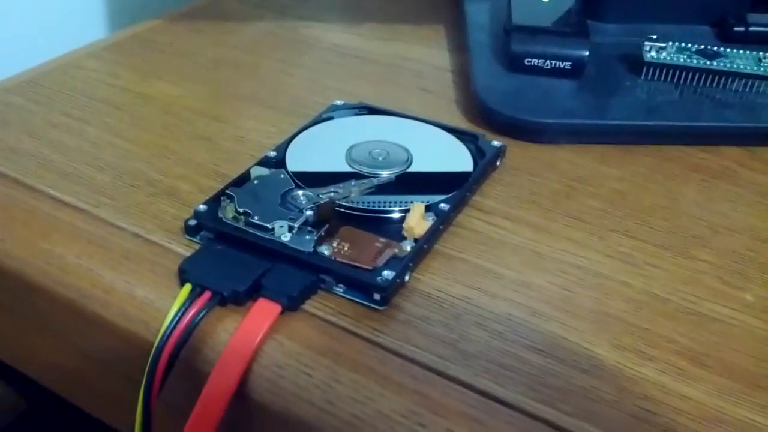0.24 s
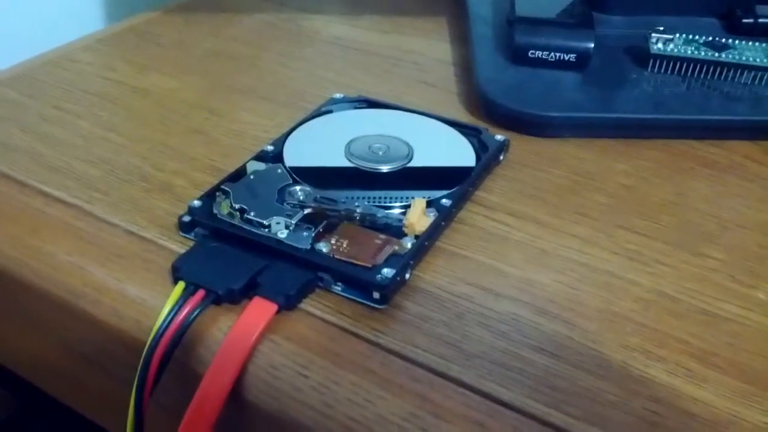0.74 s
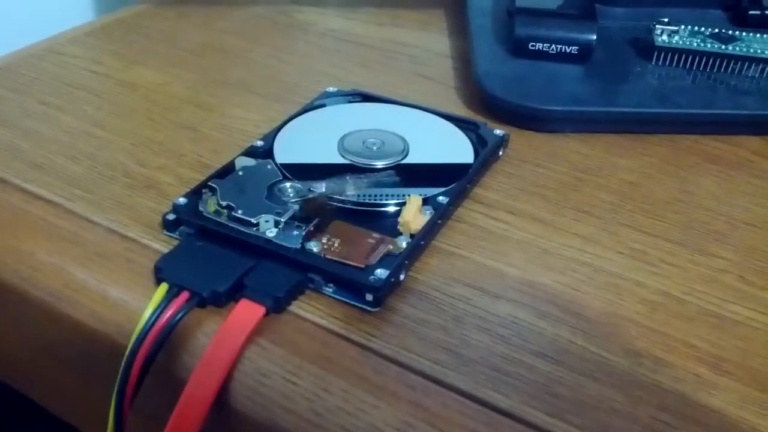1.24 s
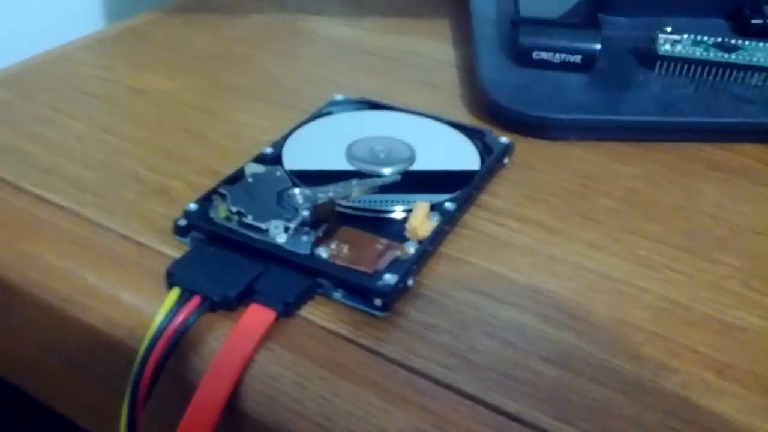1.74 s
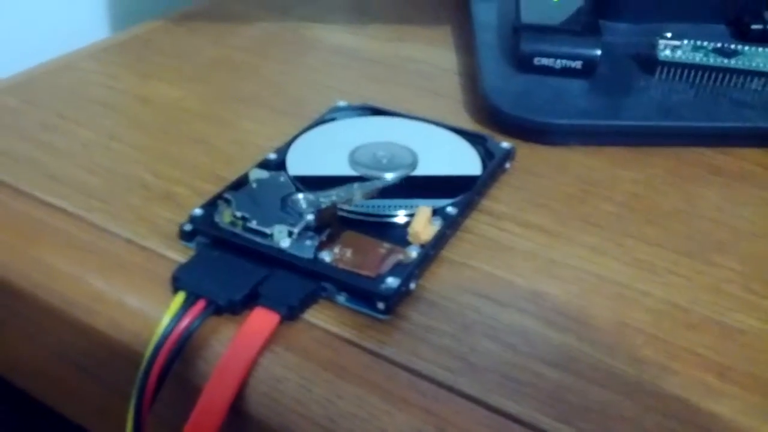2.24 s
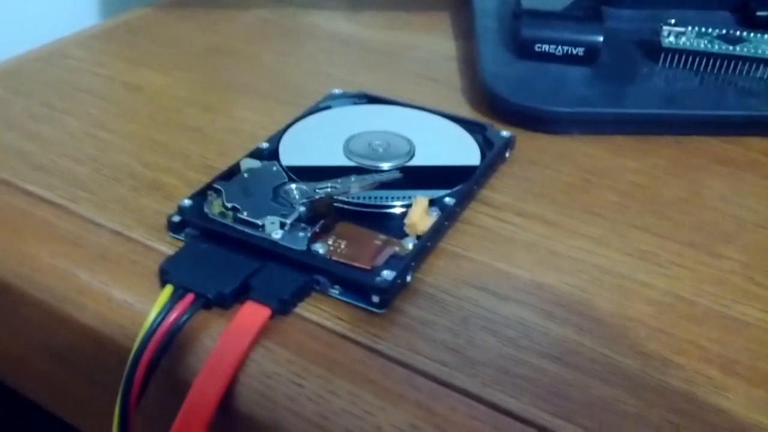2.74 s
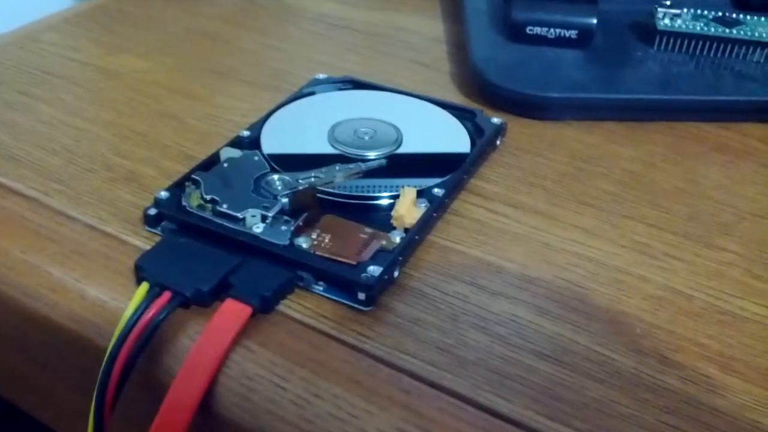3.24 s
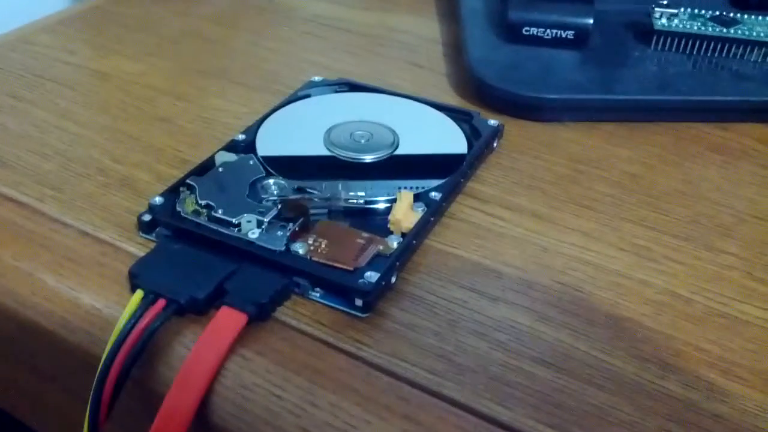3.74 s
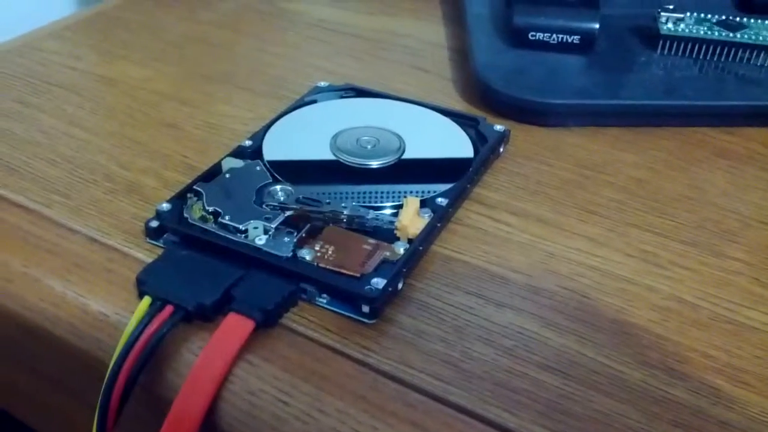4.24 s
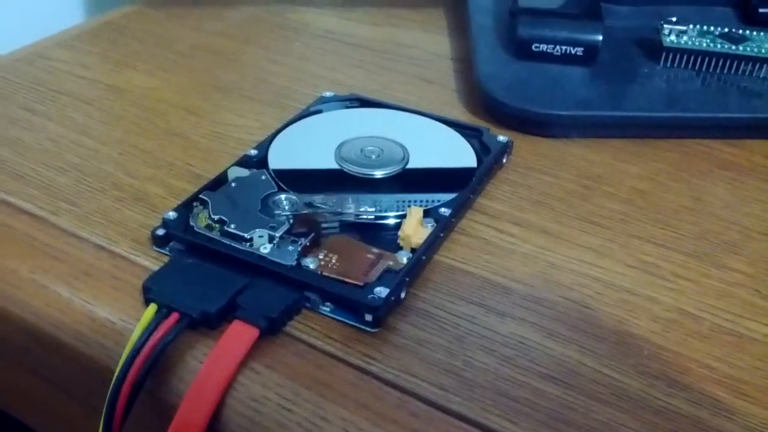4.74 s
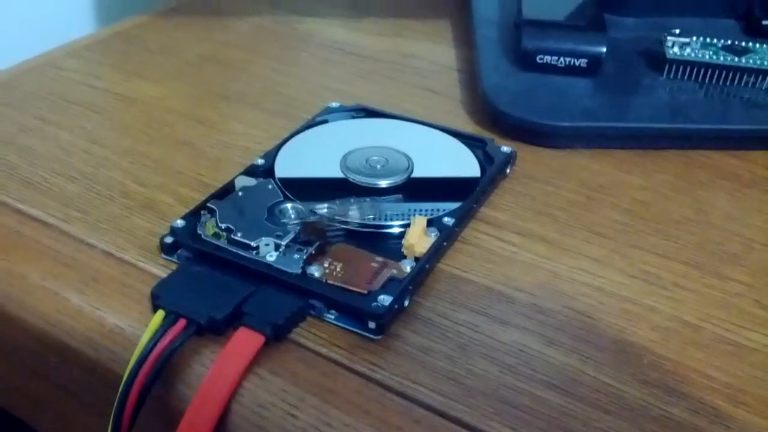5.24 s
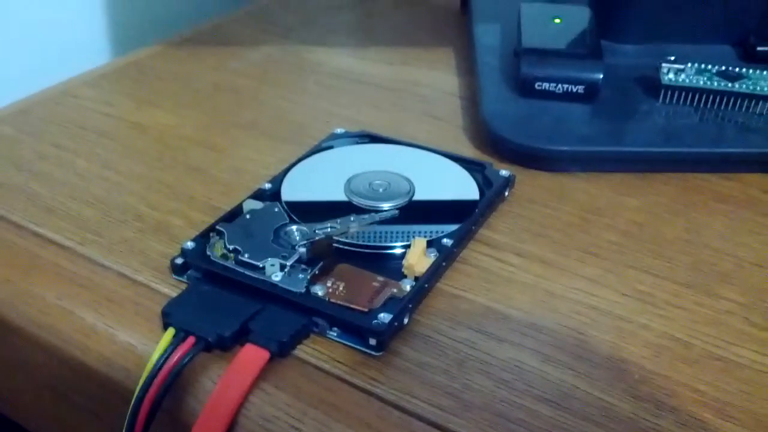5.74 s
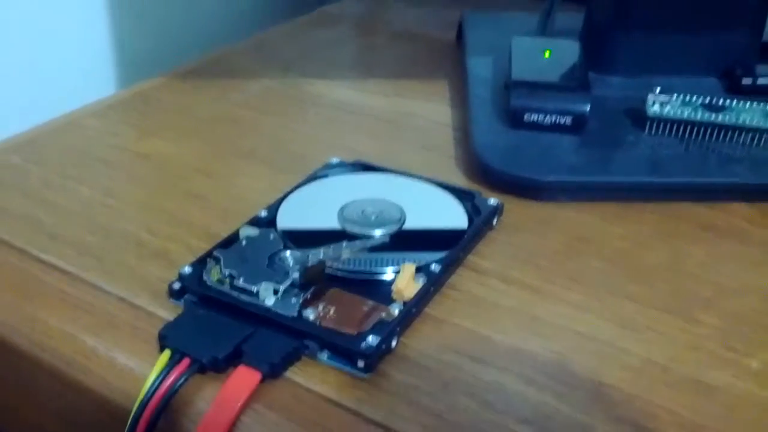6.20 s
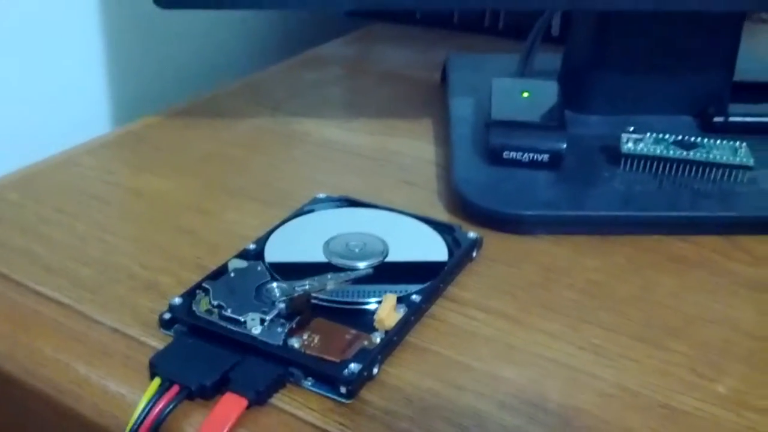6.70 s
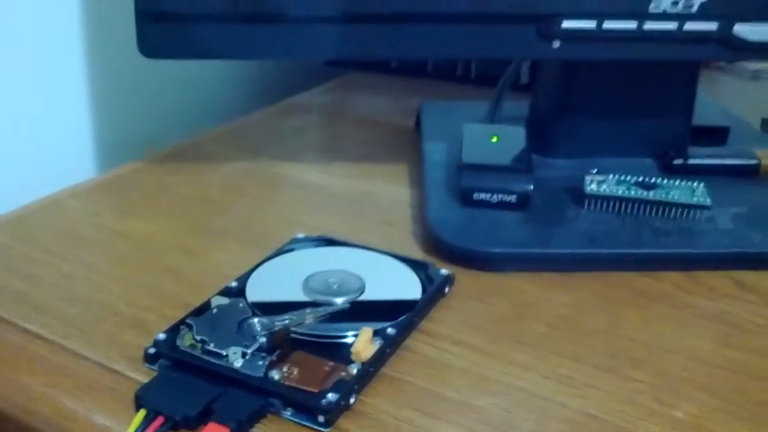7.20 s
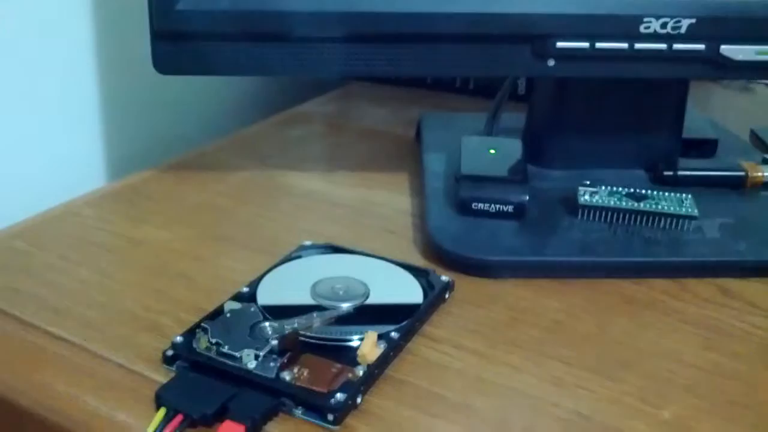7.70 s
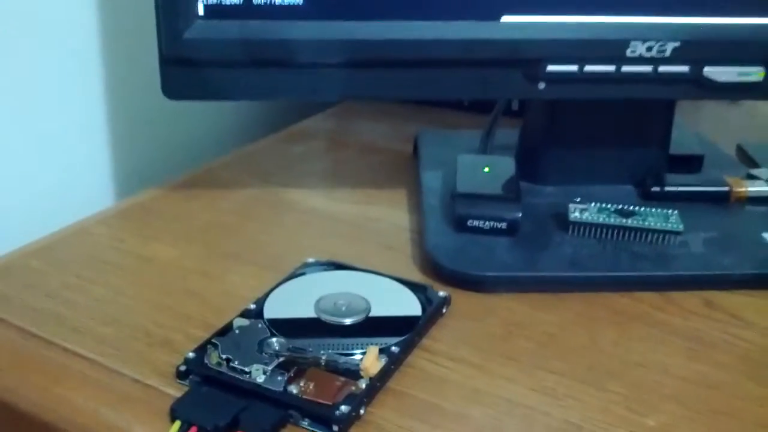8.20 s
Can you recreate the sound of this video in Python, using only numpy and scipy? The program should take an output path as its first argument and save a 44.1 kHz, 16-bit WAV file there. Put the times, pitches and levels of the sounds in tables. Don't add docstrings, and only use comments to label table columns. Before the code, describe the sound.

Close up, a failing hard drive on a wooden desk is already hissing as one sharp clack lands and it cuts out. After a quiet gap of tiny ticks, a run of five evenly spaced metallic clacks rides on bright hiss. A longer pause leaves fan hum and faint whine, then another run of clacks follows and dies away.

```python
import sys
import numpy as np
from scipy import signal
from scipy.fft import rfft, irfft, next_fast_len
from scipy.io import wavfile
from scipy.ndimage import uniform_filter1d

SR = 44100
rng = np.random.default_rng(int(sys.argv[2]) if len(sys.argv) > 2 else 0)


def dump(signal):
    limited = np.clip(np.atleast_2d(signal).T, -1, 1)
    pcm = np.round(limited * 32767).astype(np.int16)
    wavfile.write(sys.argv[1], SR, pcm)


def boost_factor(decibels):
    exponent = np.asarray(decibels, float) / 20
    return 10 ** exponent


N = 372761

# start, coil eases, coil cuts out, parked-head blip, all in seconds.
RUNS = [
    (-.1, .372, .458, .7021),
    (1.482, 3.635, 3.758, 4.0804),
    (5.584, 7.81, 7.906, 8.2117),
]
# time in seconds, blow in dB, brightness in dB per octave, rebound in dB,
# gain in dB of the low modes coupled to the desk.
SLAMS = [(0.2638, -9, -1.5, -11, -4), (1.8058, -9.5, 2.5, -7, 0.5), (2.2396, -10, 1, -11, -2.3),
         (2.67, -10, 1, -11, -2), (3.0872, -10.5, 1, -6.5, 0.2), (3.5157, -9, 0, -7, -4.5),
         (5.9402, -11, 0.6, -12, -1.5), (6.3625, -11, 0.5, -8, -1.5), (6.8013, -10, 1, -8, 0.5),
         (6.995, -21, 5.5, -26, 6.5), (7.2484, -11, 3, -4.5, 3), (7.6849, -12, 0.7, -6.5, 1.5)]
# time in seconds, level in dB, brightness in dB per octave, length in ms,
# dB the coil eases off just after.
SCUFFS = [(0.388, -26, 2.5, 3.5, 1), (0.458, -30, 4, 6.9, -1), (0.4854, -40, 4, 5.5, -6),
          (1.487, -25.5, 2.5, 9.6, -3), (1.745, -37, -8, 6, 1), (1.9257, -32, 0, 6, 3),
          (2.358, -28, 0, 3.9, 7.5), (2.775, -25, 2, 4.1, 8), (3.201, -22, 1, 6.9, -2),
          (3.638, -25.5, 0, 9.4, -4), (3.791, -42, 1, 7.5, -2), (5.6244, -23, 3.3, 7.4, 8),
          (6.05, -26.5, -1, 5.2, 5), (6.4878, -30, -4, 2.7, 2), (6.9152, -34.5, 1, 6, 0),
          (6.935, -29.5, 3, 4.9, 2), (7.3668, -28, -3, 11.5, -2), (7.815, -25, 5.3, 6.5, 1.5),
          (7.9325, -40, 7, 5.4, 1)]
ARM_HZ = [3690, 4320, 4500, 5300, 6300, 6950, 7600, 8310, 8945, 9370, 9495, 10140, 10695, 11480, 12595,
          13300, 13880, 14600, 15700]


def evened(x):
    return x / np.sqrt(np.mean(x ** 2) + 1e-20)


def read(points, hz):
    f, value = np.transpose(points)
    return np.interp(np.log(hz + 1), np.log(f + 1), value)


def curve(rows):
    s, *columns = np.transpose(rows)
    return [np.interp(np.arange(N) / SR, s, c) for c in columns]


def add(mix, s, sound):
    part = mix[round(s * SR):][:len(sound)]
    part += sound[:len(part)]


def after(times, sizes, shape):
    out = np.zeros(N)
    for s, size in zip(times, sizes):
        add(out, s, size * shape)
    return out


def coloured(gain):
    size = next_fast_len(N)
    spectrum = rfft(rng.standard_normal(size)) * gain(np.fft.rfftfreq(size, 1 / SR))
    return evened(irfft(spectrum, size)[:N])


def drift(per_s):
    pole = np.exp(-2 * np.pi * per_s * 32 / SR)
    coarse = signal.lfilter([1], [1, -pole], rng.standard_normal(N // 32 + 2))
    return evened(np.interp(np.arange(N) / 32, np.arange(len(coarse)), uniform_filter1d(coarse, size=3)))


def ringing(modes, tilt_db=0, widen=1.4):
    t, out = np.arange(4096) / SR, 0
    for k, (hz, width, db) in enumerate(modes):
        level = (-1) ** k * boost_factor(db + tilt_db * np.log2(hz / 5000)) * width * widen
        out = out + level * np.exp(-np.pi * width * widen * t) * np.sin(2 * np.pi * hz * t)
    return out


def struck(force, modes, db, tilt_db):
    sound = signal.fftconvolve(force, ringing(modes, tilt_db))
    return boost_factor(db) * sound / abs(sound).max()


def rubs(rows, modes, rise):
    t, out = np.arange(1500) / SR, np.zeros(N)
    for s, db, tilt_db, ms in rows:
        u = t / (max(ms, .3) / 1000)
        force = np.minimum(u / rise, 1) * np.exp(-u ** 2) * rng.standard_normal(len(t))
        add(out, s - .001, struck(force, modes, db, tilt_db))
    return out


def pings(rows, count):
    out = np.zeros(N)
    for s, db, hz, ms in rows:
        grit = rng.standard_normal(20 * count)
        t = np.arange(min(round(ms * SR / 1000), len(grit))) / SR
        flutter = 1 + 0.45 * evened(uniform_filter1d(grit, count))[:len(t)]
        swell = abs(np.sin(np.pi * t / t[-1])) ** 0.55
        add(out, s, boost_factor(db) * np.sqrt(2) * flutter * swell * np.sin(2 * np.pi * hz * t))
    return out


def room_tone():
    # frequency in Hz, level in dB per Hz.
    wash = [(12, -45), (20, -2), (146, -2), (347, -10.5), (446, -13), (542, -15.5), (642, -10.5),
            (718, -12.5), (1090, -14.5), (4180, -28.5), (4540, -37), (4940, -17.5), (6180, -33),
            (10500, -24), (16000, -36)]
    # frequency in Hz, width in Hz, level in dB rms.
    hums = [(131.6, 15, -66.5), (169.9, 10, -66), (221, 18, -65), (256.6, 18, -67), (360.4, 10, -74),
            (1133, 42, -71.5), (1233, 40, -73)]
    fan_hz = [58.9, 435.3, 652.9, 6480]
    fan_db = [-61.5, -65.5, -67.5, -79]
    # time in seconds, level in dB rms.
    whine = [(0, -61), (.95, -62.5), (1.1, -67), (1.5, -65), (3.7, -63), (4.3, -62.5), (4.5, -66),
             (5.5, -67.5), (7.9, -61), (8.45, -65)]
    wash_db = -52.5
    out = boost_factor(wash_db - 2.18 + 0.21 * drift(9)) * coloured(lambda hz: boost_factor(read(wash, hz)))
    for f, width, db in hums:
        out += boost_factor(db) * coloured(lambda hz: 1 / (1 + (2 * (hz - f) / width) ** 2))
    for hz, db in [*zip(fan_hz, fan_db), (10799, curve(whine)[0])]:
        turns = np.cumsum(hz + 0.5 * drift(2.76)) / SR
        out += boost_factor(db + 1.05 * drift(14)) * np.sqrt(2) * np.sin(2 * np.pi * turns)
    return out


def coil_drive():
    # main bending modes [dB], low modes [dB], head suspension modes [dB].
    seek = (-40.5, -49.5, -45.5)
    ease = (-49.5, -52.5, -49)
    retreat = (-45, -51, -50)
    cut = (-56, -56.5, -61)
    coast = (-66.5, -62.5, -71)
    idle = (-74, -67, -80)
    stir = (-64, -68, -74)
    wake = (-59.5, -59, -69)
    wait = (-64.5, -61, -72)
    # time in seconds, half-width in seconds, depth in dB.
    falters = [
        (5.62, 0.025, 9),
        (6.965, 0.073, 7),
    ]
    # time in seconds, gain in dB.
    off_axis = [(0, -2), (1.5, 1), (2.5, 0), (3.6, 1.5), (5.7, 0), (6.8, -2), (7.8, -4), (8.45, 0)]
    knots = []
    for start, ease_s, cut_s, blip in RUNS:
        knots += [(start, *wait), (start + .01, *seek), (ease_s, *seek), (ease_s + .03, *ease)]
        knots += [(cut_s, *retreat), (cut_s + .012, *cut), (cut_s + .065, *coast)]
        knots += [(blip + .165, *idle), (blip + .195, *stir), (blip + .26, *wake), (blip + .37, *wait)]
    main_db, low_db, head_db = curve(knots)
    t = np.arange(N) / SR
    falter_db = sum(db * np.exp(-((t - s) / half) ** 2) for s, half, db in falters)
    head_db = head_db - 0.49 * falter_db + curve(off_axis)[0]
    return main_db - falter_db, low_db - 0.45 * falter_db, head_db


def arm_gain(hz):
    # width in Hz, level in dB.
    mode_peaks = [(70, -16), (140, -10.5), (147, -11), (350, -19), (78, -10), (140, -8.5), (90, -13),
                  (101, -10.5), (75, -7.5), (90, -12), (99, -3.5), (90, -8), (56, -8.5), (130, -8.5),
                  (110, -5), (200, -15), (120, -10), (300, -16), (80, -13)]
    # frequency in Hz, level in dB.
    bed = [(3000, -30), (4500, -23.5), (7500, -20.5), (8600, -16), (9200, -13), (9720, -13.5), (10400, -15),
           (11000, -18), (12200, -15), (13000, -17), (14500, -19), (15800, -17)]
    power = boost_factor(read(bed, hz)) ** 2 * (hz > 2500)
    for f, (width, db) in zip(ARM_HZ, mode_peaks):
        power = power + boost_factor(db) ** 2 / (1 + (2 * (hz - f) / width) ** 2) ** 1.63
    return np.sqrt(power)


def coil():
    borders_hz = (7950, 10930)
    # frequency in Hz, level in dB.
    windage_spectrum = [(2500, -15), (3700, -6), (5000, -4.5), (5700, -9.5), (6200, -10), (7900, -10.5)]
    # time in seconds, dB the 13.3 kHz mode gains
    # and the 12.6 kHz mode loses.
    angle = [(0, -6), (3.6, -1), (5.6, 2), (6.8, 8), (8.45, 4)]
    main_db, low_db, head_db = coil_drive()
    low, high = borders_hz
    t = np.arange(6000) / SR
    surge_shape = np.minimum(t / 0.0084, 1) * np.exp(-(t / 0.067) ** 2)
    surge = after([r[0] for r in SLAMS], [boost_factor((r[1] + 12) / 2) for r in SLAMS], surge_shape)
    ease_shape = np.exp(-((t - .022) / 0.01) ** 2)
    ease_db = after([r[0] for r in SCUFFS], [r[4] for r in SCUFFS], ease_shape)

    driven = np.clip((low_db + 60) / 5, 0, 1)
    windage = coloured(lambda hz: boost_factor(read(windage_spectrum, hz)) * (hz < low))
    low_modes = coloured(lambda hz: arm_gain(hz) * (hz < low))
    low_band = np.sqrt(driven) * low_modes + np.sqrt(1 - driven) * windage
    out = boost_factor(low_db + 4.8 * surge - 0.61 * ease_db) * low_band

    main_db = main_db + 4 * surge - ease_db + (0.2 + 1.9 * surge) * drift(83)
    out += boost_factor(main_db) * coloured(lambda hz: arm_gain(hz) * (hz >= low) * (hz < high))

    head_db = head_db + 0.43 * surge - 0.46 * ease_db + 0.27 * drift(40)
    out += boost_factor(head_db) * coloured(lambda hz: arm_gain(hz) * (hz >= high))
    turn_db = curve(angle)[0]
    out += boost_factor(head_db - 12 + turn_db) * coloured(lambda hz: 1 / (1 + ((hz - 13300) / 200) ** 2))
    out += boost_factor(head_db - 10.5 - turn_db) * coloured(lambda hz: 1 / (1 + ((hz - ARM_HZ[14]) / 70) ** 2))
    return out * boost_factor(0.37 * drift(60))


def shifting(x, depth_db):
    z = signal.stft(x, nperseg=512)[2]
    patches = uniform_filter1d(rng.standard_normal(z.shape), size=5, axis=0)
    patches = uniform_filter1d(patches, size=14, axis=1)
    return signal.istft(z * boost_factor(depth_db * evened(patches)), nperseg=512)[1][:N]


def slams():
    casting_hz = [1110, 1380, 1670, 1900, 2240, 2460, 3170, 3665, 4000, 4800, 5290, 5800, 6450, 6950, 7800,
                  8950, 9490, 10200, 10700, 11600, 12600]
    # width in Hz, level in dB.
    casting = [(59.4, -14.5), (60, -19.5), (59.7, -12), (68, -23.5), (69, -12), (77, -6.5), (70, -6),
               (104, -6), (200, -1.5), (200, -15), (210, -5), (200, -12.5), (202, -2), (166, 6), (170, -3),
               (130, -7), (119, -6), (200, -55.5), (150, -51), (300, -17.5), (200, -29)]
    plate_hz = (6200, 8000)
    rebound_ms, scatter_db = 6.8, 2.2
    t, out = np.arange(4096) / SR, np.zeros(N)
    for s, db, tilt_db, rebound_db, desk_db in SLAMS:
        modes = []
        for hz, (width, mode_db) in zip(casting_hz, casting):
            mode_db = mode_db + desk_db * (hz < 3400) + scatter_db * rng.standard_normal()
            modes.append((hz, width, mode_db))
        plate = [m for m in modes if plate_hz[0] < m[0] < plate_hz[1]]
        base = [m for m in modes if m[0] < 3400]
        frame = [m for m in modes if m not in plate + base]
        ring = ringing(frame, tilt_db) * (1 - np.exp(-(t / .001) ** 2))
        ring += ringing(plate, tilt_db) * (1 - np.exp(-(t / .0019) ** 3))
        ring += ringing(base, tilt_db) * (1 - np.exp(-t / 0.0027))
        grit = np.diff(rng.standard_normal(len(t)), 2, prepend=[0, 0])
        force = boost_factor(-24.5) * grit * np.exp(-t / 0.0027)
        force[0] += 1
        force[round(rebound_ms * SR / 1000)] += boost_factor(rebound_db)
        sound = signal.fftconvolve(force, ring)
        add(out, s - .001, boost_factor(db - 1.45) * sound / abs(sound).max())
    return out


def rumbles():
    times = [.36, .5, 2.1, 3.95, 5.02, 5.06, 6.38]
    # level in dB rms, frequency in Hz, length in ms.
    swells = [
        (-56, 140, 210),
        (-67, 450, 56),
        (-62, 120, 55),
        (-58, 170, 440),
        (-58, 170, 140),
        (-54.5, 218.4, 69),
        (-53.5, 133, 180),
    ]
    return pings([(s, *row) for s, row in zip(times, swells)], count=900)


def scuffs():
    # frequency in Hz, width in Hz, level in dB.
    ramp = [(1790, 90, -13), (2446, 60, -4), (3760, 210, 0.5), (4770, 420, 1.5), (5140, 94, 2.5),
            (5670, 190, -7.5), (6540, 340, -7.5), (7940, 175, -1), (9460, 400, -2)]
    return rubs([row[:4] for row in SCUFFS], ramp, rise=0.5)


def parking(routine):
    return [(run[3] + s, *rest) for run in RUNS for s, *rest in routine]


def latch():
    # frequency in Hz, width in Hz, level in dB.
    latch_modes = [(3760, 340, -7), (5330, 170, -11), (5800, 240, -9), (8880, 330, -2.5), (9750, 260, -7),
                   (10840, 89, -7), (12700, 270, -30)]
    # seconds from the blip, level in dB, brightness in dB per octave, length in ms.
    park_ticks = [
        (-.1629, -41.5, -2, 2.9),
        (.0664, -38, 1.5, 3.4),
        (.1684, -42, 6, 3),
        (.2384, -40, 3, 4.2),
    ]
    # time in seconds, level in dB, brightness in dB per octave, length in ms.
    stray_ticks = [
        (3.983, -55, 0.1, 3),
        (4.4472, -53, 0.1, 3),
        (4.529, -44, -3, 3.3),
        (4.6527, -51, 0.1, 3),
        (5.0974, -55, -5, 3),
        (8.121, -53, 4, 3),
        (8.133, -57, 4, 3),
    ]
    # seconds from the blip, level in dB rms, frequency in Hz, length in ms.
    park_rings = [
        (-.162, -52, 4170, 15),
        (.191, -54.5, 10100, 19),
        (.196, -63.5, 5600, 21),
        (.241, -52, 8300, 12),
        (.244, -53.5, 4330, 8),
    ]
    # time in seconds, level in dB rms, frequency in Hz, length in ms.
    stray_rings = [
        (1.742, -56, 2250, 7),
        (3.655, -58, 15000, 20),
        (3.69, -52, 14350, 58),
        (3.792, -48, 7300, 6.3),
        (4.346, -61, 7100, 22),
        (7.934, -51.5, 7250, 6.2),
        (8.395, -70, 13800, 17),
    ]
    ticks = rubs(parking(park_ticks) + stray_ticks, latch_modes, rise=0.06)
    return ticks + pings(parking(park_rings) + stray_rings, count=130)


def chatter():
    gap_s, jitter, level_db, spread_db = .0245, .3, -63.5, 4
    rows = []
    for run, following in zip(RUNS, RUNS[1:]):
        gap, size = rng.standard_normal((60, 2)).T
        s = run[3] + .37 + np.cumsum(gap_s * (1 + jitter * np.clip(gap, -1.5, 2)))
        rows += [row for row in zip(s, level_db + spread_db * size) if row[0] < following[0]]
    return rows


def parked_head():
    park_blip_db = [-54, -54, -60]
    blip_hz, blip_ms, nudge_db = 12060, 8, -4
    rows = chatter()
    parked = [(run[3], db) for run, db in zip(RUNS, park_blip_db)]
    blips = [(s - .002, db, blip_hz, blip_ms) for s, db in rows + parked]
    nudged_hz = rng.choice(ARM_HZ[7:11], 120)
    nudges = [(s, db + nudge_db, hz, blip_ms) for (s, db), hz in zip(rows, nudged_hz)]
    return pings(blips + nudges, count=130)


def thumps():
    # time in seconds, peak in dB, after-swing in Hz.
    pushes = [
        (2, -37.5, 90),
        (4.929, -39.5, 90),
        (5.479, -38, 110),
        (5.925, -35, 90),
    ]
    t, out = np.arange(2000) / SR, np.zeros(N)
    for s, db, hz in pushes:
        push = np.exp(-((t - .002) / 0.00035) ** 2)
        swing = np.exp(-t / 0.014) * np.sin(2 * np.pi * hz * t) * np.minimum(t / 0.0048, 1)
        add(out, s, boost_factor(db) * (push - 0.53 * swing))
    return out


def desk(x):
    # frequency in Hz, decay time t60 in seconds.
    decay = [(1000, 0.24), (2500, 0.19), (4000, 0.043), (7000, 0.068), (12000, 0.049)]
    taps = np.zeros(SR // 3)
    at = np.arange(120, len(taps) - 20, 20)
    taps[at + rng.integers(0, 20, len(at))] = rng.choice([-1., 1.], len(at))
    hz, t, z = signal.stft(taps, SR, nperseg=128)
    tail = signal.istft(z * boost_factor(-60 * t / read(decay, hz)[:, None]), SR, nperseg=128)[1]
    return signal.fftconvolve(x, tail / np.linalg.norm(tail))[:N]


def scene():
    room = room_tone() + thumps() + rumbles()
    hiss = shifting(coil(), depth_db=1.5)
    hits = slams() + scuffs()
    small = latch() + parked_head()
    reflections = boost_factor(-3.5) * desk(hits + boost_factor(-15) * small)
    return (hits + small + reflections + hiss + room)[None]


def low_pass(x):
    return signal.sosfilt(signal.butter(12, 16500, fs=SR, output="sos"), x)


def record(dry):
    edge = signal.firwin(801, 15740, window=("kaiser", 9), fs=SR)
    mix = signal.oaconvolve(dry, edge[None], "same") - .0006
    return low_pass(mix)


dry = scene()
out = record(dry)
dump(out)
```